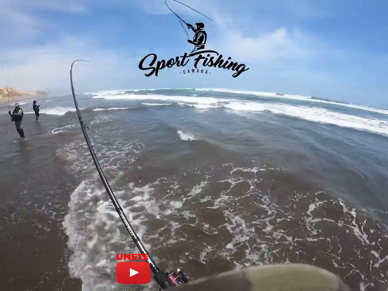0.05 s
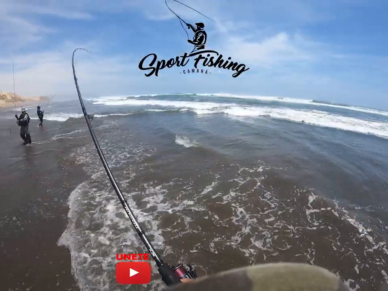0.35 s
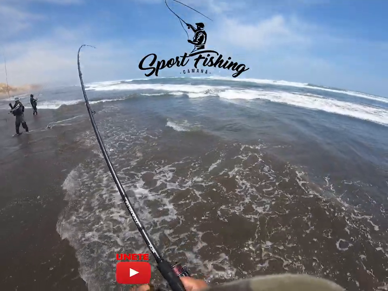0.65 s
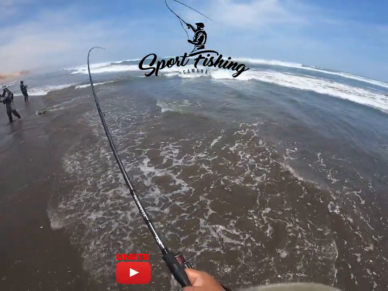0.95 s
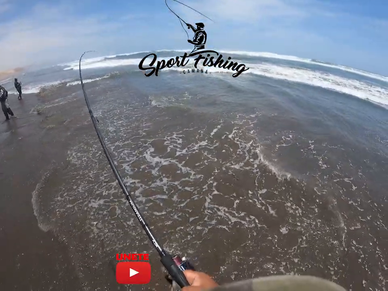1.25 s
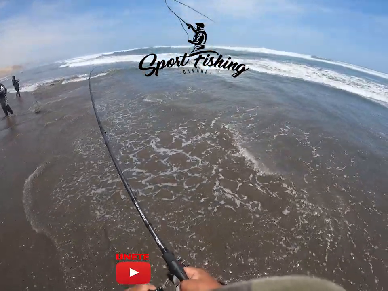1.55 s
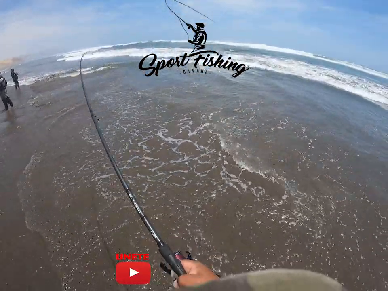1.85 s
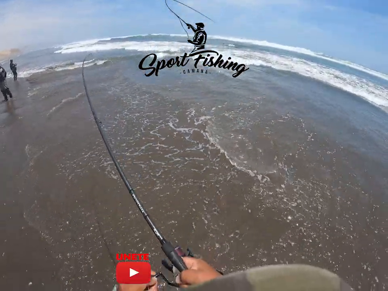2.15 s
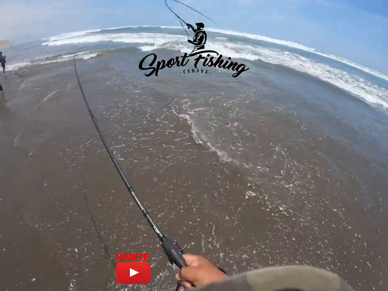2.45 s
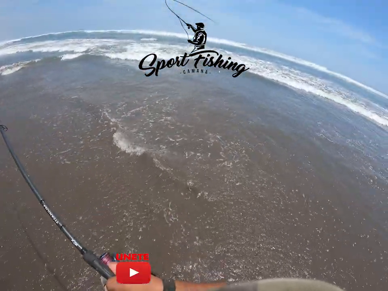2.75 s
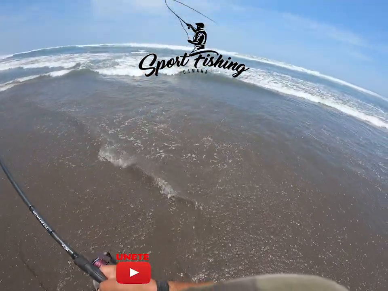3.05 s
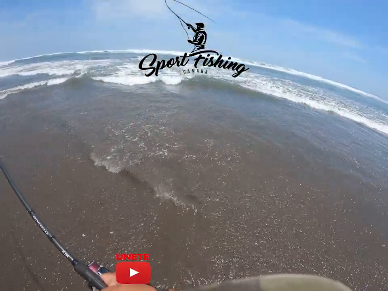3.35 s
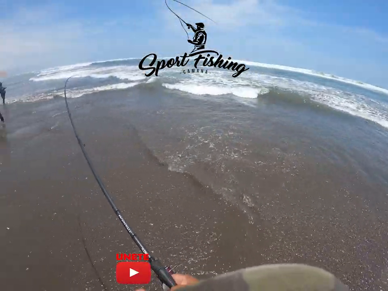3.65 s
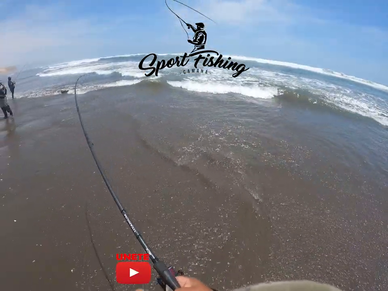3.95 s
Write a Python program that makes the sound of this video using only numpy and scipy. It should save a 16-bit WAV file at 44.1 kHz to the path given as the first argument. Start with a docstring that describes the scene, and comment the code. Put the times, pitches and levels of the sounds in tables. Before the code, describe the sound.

Ocean surf roars and booms steadily off a flat sandy beach while foam hisses at the water's edge. Gusts rumble softly on the microphone, and near the end a small wave slops in with a hollow plop.

```python
"""A flat sandy beach, at the water's edge, heard through two closely spaced microphone ports.
Distant breakers merge into a steady roar and a deep boom, a little to the right.
Nearby foam hisses and fizzes with ringing bubbles, swelling as a small wave slops in.
Gusts rumble softly on the microphone. One short resonance makes a hollow plop."""
import sys
import numpy as np
from scipy import signal
from scipy.fft import rfft, irfft
from scipy.io import wavfile

SR = 44100
rng = np.random.default_rng(int(sys.argv[2]) if len(sys.argv) > 2 else 0)


def digitize_waveform(pressure):
    """Quantize a signal to 16-bit integers and store it at the path in sys.argv[1].

    Rows of a 2-D input are taken as channels; values are limited to [-1, 1].
    """
    field = np.atleast_2d(pressure).T
    bounded = np.clip(field, -1, 1)
    quanta = np.round(bounded * 32767).astype(np.int16)
    wavfile.write(sys.argv[1], SR, quanta)


N = 176400
T = np.arange(N) / SR
HZ = np.maximum(np.arange(N // 2 + 1) * SR / N, 1)

# Port coherence. Each row: frequency in Hz, coherence from 0 to 1.
PORT_COHERENCE = [(100, 1), (300, 1), (600, 0.99), (1000, .95), (1400, 0.83), (2100, 1), (3700, 0.56),
                  (5300, 0.92), (8200, 0.66), (12000, 0.8)]
# Port phase. Each row: frequency in Hz, lead of the left in radians.
PORT_PHASE_RAD = [(100, 0.15), (500, -0.35), (900, -0.41), (1250, -0.53), (1900, -0.54), (2900, -0.95),
                  (3600, -0.25), (4700, -0.17), (7400, 0.031), (11000, 0)]
# Port balance. Each row: frequency in Hz, left minus right in dB.
PORT_BALANCE_DB = [(600, 0), (1050, 0.5), (1600, -.5), (3000, -1.2), (3900, 0), (5300, -1.5), (7500, 1),
                   (12000, 1.5)]

# Wind rumble. Each row: frequency in Hz, relative density in dB.
WIND_SPECTRUM_DB = [(8, -30), (22, -8), (38, 0), (58, 0), (85, -1), (140, -5), (300, -35), (900, -78),
                    (5000, -100)]
# Gusts. Each row: time in seconds, relative level in dB.
GUST_LEVEL_DB = [(0.1, -34), (0.32, -28), (0.5, -27), (0.62, -33), (0.8, -24), (0.95, -28), (1.18, -32.5),
                 (1.45, -26), (1.72, -32), (1.9, -22), (2.15, -26.5), (2.5, -24), (2.75, -31.5),
                 (3.05, -26.5), (3.25, -35), (3.45, -27), (3.68, -32), (3.87, -22), (4.0, -24.5)]

# Slops of the small wave. Each row: peak time in seconds, half length in seconds, level in dB.
SLOP_SWELLS = [(3.095, .055, -32), (3.39, .05, -38), (3.72, .17, -39.5)]
# Large bubbles. Each row: frequency in Hz, relative density in dB.
SLOP_SPECTRUM_DB = [(100, -40), (500, -26), (900, -4), (1300, 4), (1850, 4), (2600, -21), (12000, -50)]
# Sizzles on the wave. Each row: peak time in seconds, half length in seconds, level in dB.
SIZZLE_SWELLS = [(3.39, .035, -37.5), (3.705, .025, -38.5)]
# Fine bubbles. Each row: frequency in Hz, relative density in dB.
SIZZLE_SPECTRUM_DB = [(1500, -25), (3500, -2), (5000, 9), (6500, -13), (9000, -21), (14000, -40)]

# Foam hiss and fizz. Each row: frequency in Hz, relative density in dB.
FOAM_SPECTRUM_DB = [(700, -16), (1600, -1), (2600, -2.5), (3600, -3.5), (4500, -2), (5200, -1),
                    (6000, -3.5), (7700, -10), (8200, -14), (9600, -16), (11000, -21), (12200, -22),
                    (13300, -31), (14500, -41)]
# Foam envelope. Each row: time in seconds, relative level in dB.
FOAM_LEVEL_DB = [(0.1, -36.5), (0.4, -38), (0.7, -37), (1.05, -38), (1.55, -36.5), (1.9, -37.5),
                 (2.3, -37.5), (2.65, -38.5), (2.9, -36), (3.08, -35), (3.25, -36.5), (3.4, -35.5),
                 (3.7, -35), (4.0, -36)]
# Foam position. Each row: time in seconds, left minus right in dB.
FOAM_PAN_DB = [(0.08, 0), (0.39, -0.5), (1.64, -0.5), (2.55, -0.5), (2.78, 1.5), (3.57, 1.5), (3.78, -1),
               (3.97, -1)]

# Breaker roar. Each row: frequency in Hz, relative density in dB.
ROAR_SPECTRUM_DB = [(20, -33), (100, -21), (200, -4), (330, 1), (420, -1), (520, -3), (640, -1.5),
                    (820, -4), (1100, -4), (1400, -8), (1800, -8.5), (2200, -11), (3000, -19),
                    (5000, -31.5), (14000, -70)]
# Roar envelope. Each row: time in seconds, relative level in dB.
ROAR_LEVEL_DB = [(0.1, -29.5), (0.45, -30.5), (0.75, -29.5), (1.1, -29.5), (1.6, -29.0), (2.2, -29.5),
                 (2.55, -30.0), (3.0, -28.5), (3.3, -30), (3.55, -29), (3.8, -28.5), (4.0, -29.5)]
# Surf boom. Each row: frequency in Hz, relative density in dB.
BOOM_SPECTRUM_DB = [(35, -40), (70, -4), (110, -2), (170, -0.5), (230, -2.5), (320, -8), (450, -17.5),
                    (900, -43), (5000, -100)]
# Boom envelope. Each row: time in seconds, relative level in dB.
BOOM_LEVEL_DB = [(0.1, -20.5), (0.32, -22.5), (0.45, -22), (0.62, -25), (0.8, -21), (1.0, -22), (1.2, -25),
                 (1.4, -26), (1.7, -23), (1.95, -25), (2.2, -28), (2.35, -23.5), (2.7, -26), (3.0, -25.5),
                 (3.2, -23), (3.55, -22.5), (3.85, -23), (4.0, -29)]
# Hollow band in the roar. Each row: time in seconds, centre in Hz.
HOLLOW_CENTRE_HZ = [(0.1, 1040), (0.55, 1090), (0.9, 990), (1.5, 945), (2.1, 950), (2.6, 1000), (3.1, 970),
                    (3.5, 1010), (3.9, 950)]
# Hollow band envelope. Each row: time in seconds, level in dB.
HOLLOW_LEVEL_DB = [(0.1, -39), (0.55, -35.5), (0.9, -35), (1.3, -41), (2.4, -37), (2.8, -37.5),
                   (3.4, -38.5), (3.85, -33.5)]


def amp(db):
    """Decibels to gain."""
    return 10 ** (np.asarray(db) / 20)


def unit(x):
    """Scale to rms 1."""
    return x / np.sqrt(np.mean(x ** 2))


def over_time(rows):
    """A (seconds, value) table at every sample."""
    return np.interp(T, *np.array(rows).T)


def over_hz(rows):
    """A (Hz, value) table at every FFT bin."""
    hz, value = np.array(rows).T
    return np.interp(np.log(HZ), np.log(hz), value)


def swells(rows):
    """Gain envelope: one Gaussian per row."""
    return sum(amp(db) * np.exp(-((T - peak_s) / half_s) ** 2) for peak_s, half_s, db in rows)


def colour(white, spectrum_db):
    """Shape a white signal to a spectrum, at rms 1."""
    return unit(irfft(rfft(white) * amp(over_hz(spectrum_db)), N))


def drift(rate_hz):
    """Noise low-passed near rate_hz, at rms 1."""
    return unit(irfft(rfft(rng.standard_normal(N)) * np.exp(-(HZ / rate_hz) ** 2), N))


def narrow_noise(centre_hz, half_width_hz):
    """Two independent noise bands around a moving centre."""
    phase = 2 * np.pi * np.cumsum(centre_hz) / SR
    return np.array([drift(half_width_hz) * np.cos(phase) + drift(half_width_hz) * np.sin(phase)
                     for _ in range(2)])


def churn(flicker_db, rate_hz):
    """Two white noises whose octave bands flicker independently."""
    spectrum, pair = rfft(rng.standard_normal((2, N))), 0
    for octave in range(12):
        band = np.maximum(1 - abs(np.log2(HZ / (SR / 2)) + octave), 0)
        pair = pair + irfft(spectrum * band, N) * amp(flicker_db * drift(rate_hz))
    return pair


def spread(pair, coherence):
    """Mix two independent signals to left and right of a given coherence."""
    mid = pair[0] * np.sqrt((1 + coherence) / 2)
    side = pair[1] * np.sqrt((1 - coherence) / 2)
    return np.array([mid + side, mid - side])


def ports(pair):
    """The wide sea at two ports: coherent in the bass, the right leading in the midrange."""
    lean = amp(over_hz(PORT_BALANCE_DB) / 2) * np.exp(1j * over_hz(PORT_PHASE_RAD) / 2)
    spectra = spread(rfft(pair), over_hz(PORT_COHERENCE))
    return irfft(spectra * np.array([lean, 1 / lean]), N)


def wind(gain_db=1.84, pan_db=-0.5):
    """Gusts buffet the microphone with a low rumble."""
    rumble = spread(colour(rng.standard_normal((2, N)), WIND_SPECTRUM_DB), coherence=0.94)
    return rumble * amp(gain_db + over_time(GUST_LEVEL_DB) + np.array([[pan_db], [-pan_db]]) / 2)


def plop(start_s=3.1203, pitch_hz=920, peak_db=-13.8, rise_s=0.002):
    """One hollow resonance swells and dies within a few cycles."""
    age_s = np.maximum(T - start_s, 0)
    rise = age_s / rise_s
    envelope = rise * np.exp((1 - rise ** 2) / 2)
    return amp(peak_db) * envelope * np.sin(2 * np.pi * pitch_hz * age_s)


def bubbles(low_hz, high_hz, bursts_per_s=700, spread_db=3, ring_cycles=4.3):
    """Bubbles of 18 sizes burst at random and ring briefly; the rate is per size and channel."""
    pair = 0
    for hz in np.geomspace(low_hz, high_hz, 18):
        bursts = rng.random((2, N)) < bursts_per_s / SR
        strength = amp(spread_db * np.minimum(rng.exponential(size=(2, N)), 5))
        polarity = rng.choice([-1, 1], (2, N))
        pole = np.exp((2j * np.pi - 2 / ring_cycles) * hz / SR)
        ringing = signal.lfilter([1], [1, -pole], bursts * strength * polarity).imag
        pair = pair + np.sqrt(hz) * unit(ringing)  # equal power per Hz
    return pair


def small_wave():
    """A wave tips over close by: large bubbles slop, fine ones sizzle."""
    slop = colour(bubbles(low_hz=586, high_hz=3900), SLOP_SPECTRUM_DB)
    sizzle = colour(bubbles(low_hz=3040, high_hz=10100), SIZZLE_SPECTRUM_DB)
    return ports(slop * swells(SLOP_SWELLS) + sizzle * swells(SIZZLE_SWELLS))


def foam(fizz_db=-3.5):
    """Swash on the sand: a smooth hiss, with nearer bubbles fizzing on top."""
    hiss = colour(churn(flicker_db=0.5, rate_hz=13), FOAM_SPECTRUM_DB)
    fizz = amp(fizz_db) * colour(bubbles(low_hz=1240, high_hz=12750), FOAM_SPECTRUM_DB)
    pan_db = over_time(FOAM_PAN_DB)
    return ports(hiss + fizz) * amp(over_time(FOAM_LEVEL_DB) + np.array([pan_db, -pan_db]) / 2)


def breakers(roar_gain_db=2.03, boom_gain_db=-0.3, flutter_db=0.22):
    """Waves breaking far out merge into a churning roar, a deep boom and a drifting hollow band."""
    roar = ports(colour(churn(flicker_db=1.03, rate_hz=4.3), ROAR_SPECTRUM_DB))
    roar *= amp(roar_gain_db + over_time(ROAR_LEVEL_DB))
    boom = ports(colour(churn(flicker_db=0.4, rate_hz=9), BOOM_SPECTRUM_DB))
    boom *= amp(boom_gain_db + over_time(BOOM_LEVEL_DB))
    hollow = ports(narrow_noise(over_time(HOLLOW_CENTRE_HZ), half_width_hz=95))
    hollow *= amp(over_time(HOLLOW_LEVEL_DB))
    return (roar + boom + hollow) * amp(flutter_db * drift(rate_hz=38))


def scene():
    """Stereo sum of all sources."""
    return breakers() + foam() + small_wave() + wind() + plop()


def record(dry, start_s=0.046, cutoff_hz=14400):
    """Mute until start_s, then low-pass steeply."""
    lowpass = signal.ellip(10, 0.1, 80, cutoff_hz, fs=SR, output="sos")
    return signal.sosfilt(lowpass, dry * (T >= start_s))


dry = scene()
out = record(dry)
digitize_waveform(out)
```